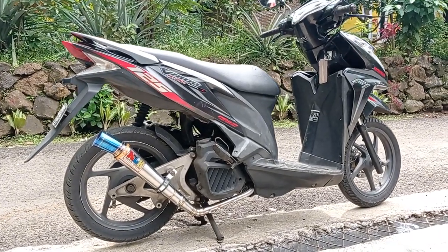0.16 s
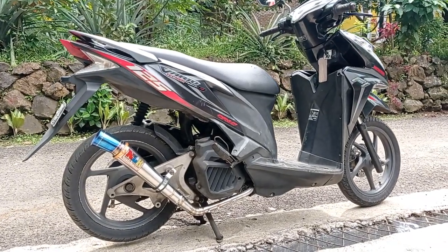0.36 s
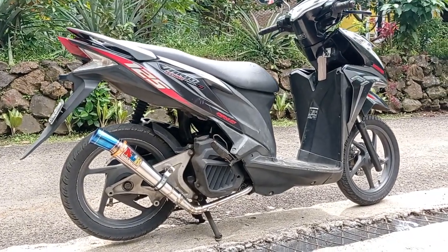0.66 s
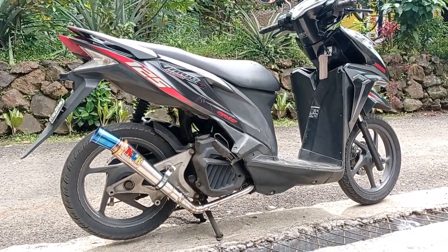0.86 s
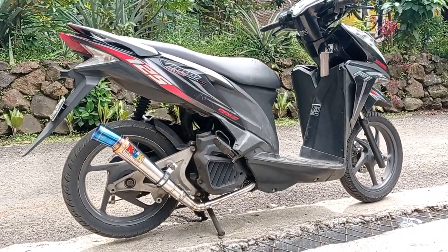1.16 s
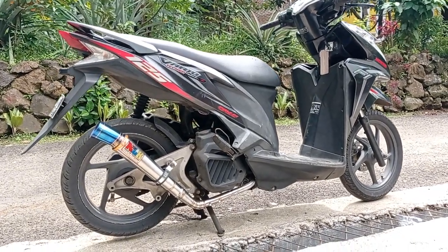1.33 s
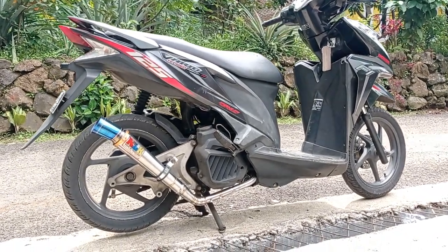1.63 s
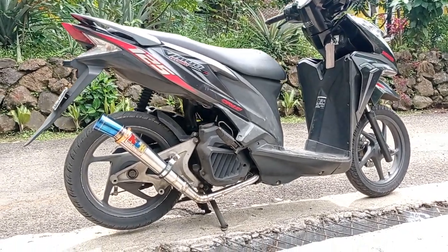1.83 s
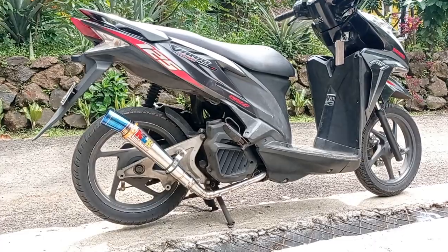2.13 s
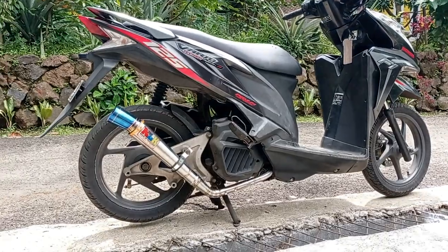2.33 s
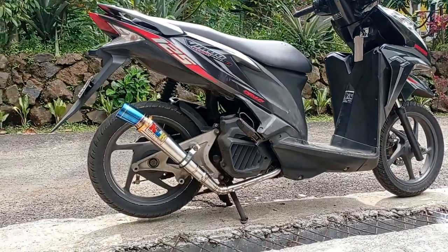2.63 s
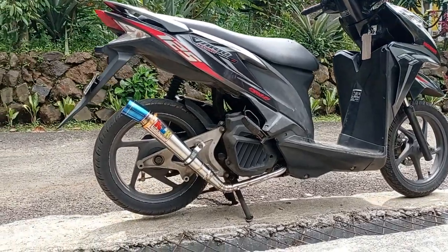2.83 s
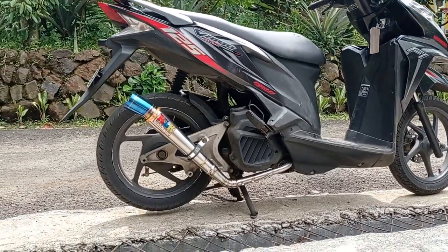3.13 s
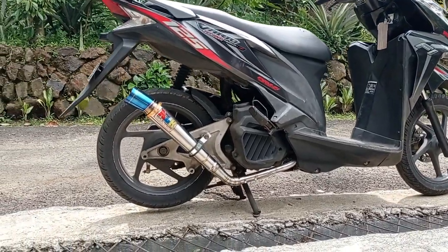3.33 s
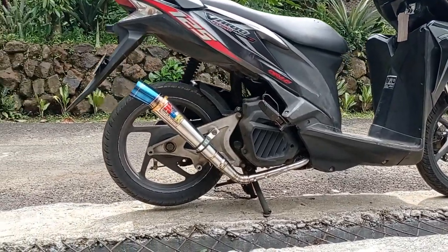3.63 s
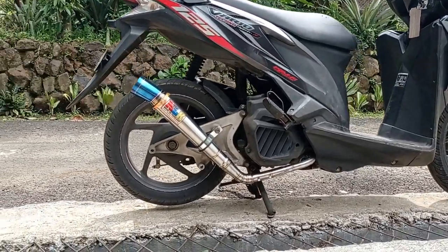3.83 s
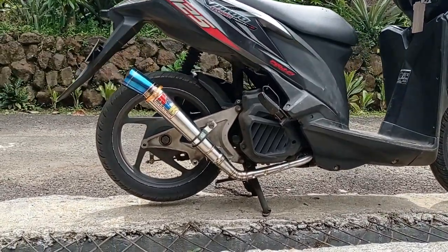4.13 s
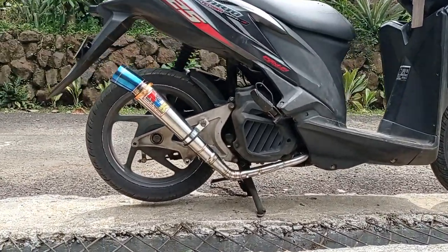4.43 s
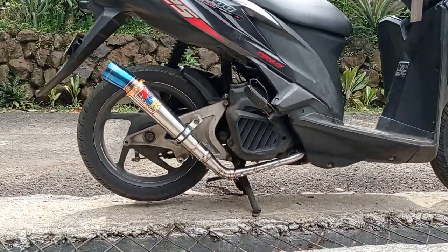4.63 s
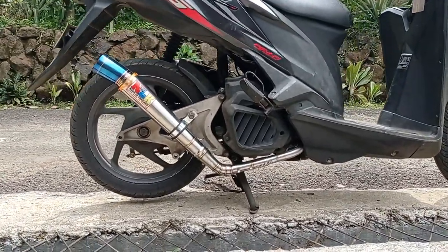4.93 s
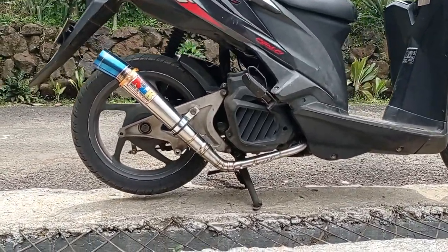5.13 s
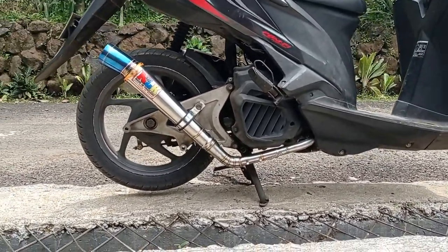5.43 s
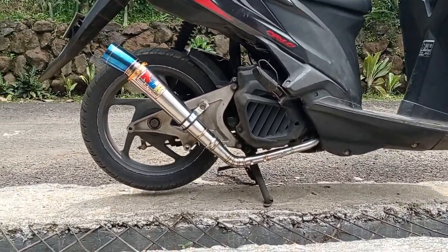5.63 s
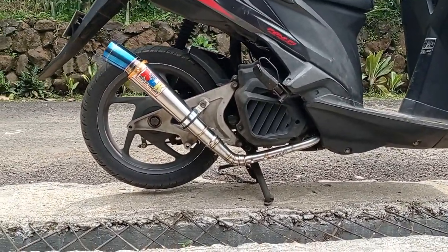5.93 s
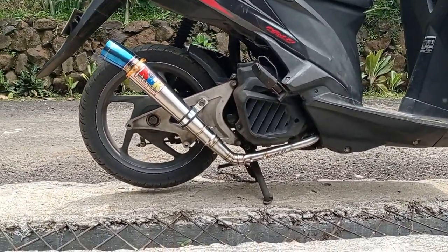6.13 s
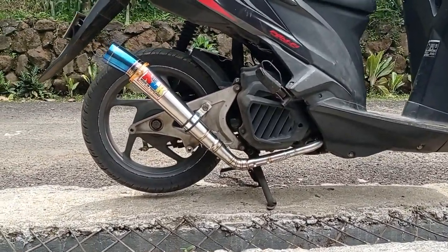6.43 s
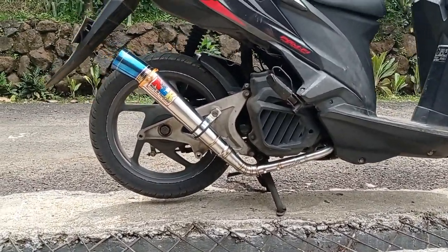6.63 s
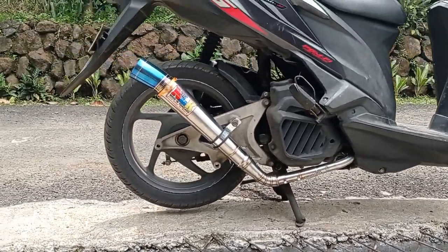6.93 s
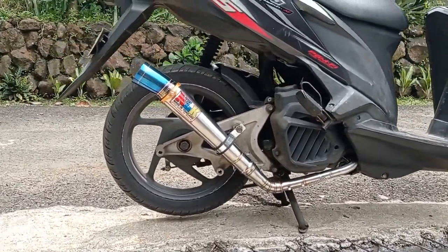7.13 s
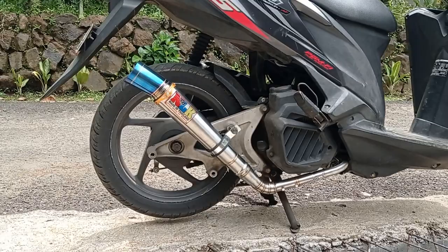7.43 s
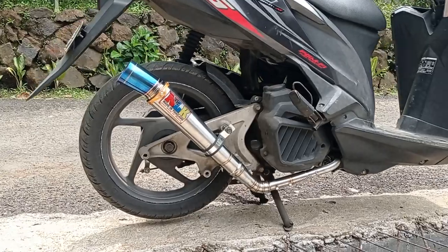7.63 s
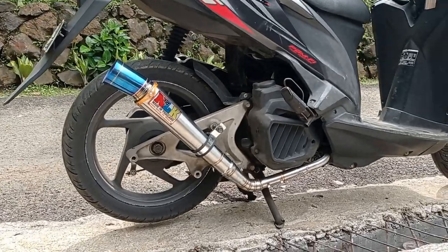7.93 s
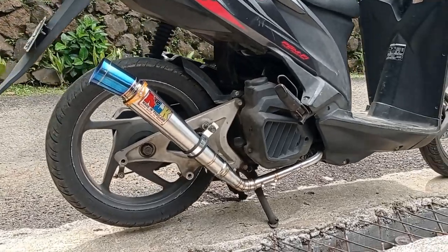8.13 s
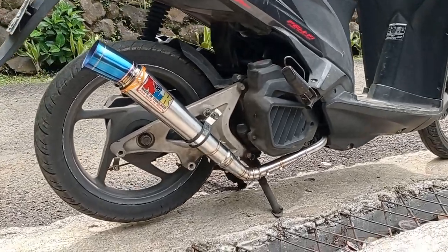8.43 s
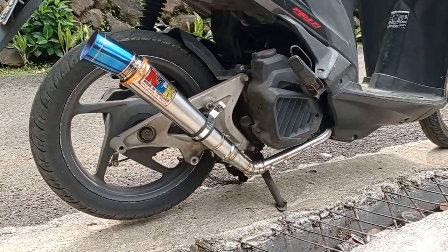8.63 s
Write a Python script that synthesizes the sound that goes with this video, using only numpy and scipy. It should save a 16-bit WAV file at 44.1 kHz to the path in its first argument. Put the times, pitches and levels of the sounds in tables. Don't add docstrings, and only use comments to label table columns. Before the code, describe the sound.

A small single-cylinder scooter engine idles unevenly through an open exhaust, rapid hollow thumps with metallic ring and hiss, dropping early to slower idle.

```python
import sys
import numpy as np
from scipy import signal
from scipy.fft import rfft, irfft, next_fast_len
from scipy.io import wavfile
from scipy.ndimage import uniform_filter1d, minimum_filter1d, map_coordinates

SR = 44100
rng = np.random.default_rng(int(sys.argv[2]) if len(sys.argv) > 2 else 0)


def to_linear_factor(level_db):
    exponent = np.asarray(level_db, float) / 20
    return 10 ** exponent


def bounce(signal):
    frames = np.transpose(np.atleast_2d(signal))
    limited = np.clip(frames, -1, 1)
    pcm = np.round(limited * 32767).astype(np.int16)
    wavfile.write(sys.argv[1], SR, pcm)


N = 387198
MS = np.arange(-14 * SR // 1000, 70 * SR // 1000) * 1000 / SR
FAST_IDLE_ENDS_S = .93

# (time [s], pipe ring [dB], can ring [dB], valve-shut wave [dB], facing the outlet [0-1])
ENGINE_STATE = [
    (0, -13.5, -13.5, -16.5, 0.08),
    (.92, -11, -13.5, -26, 0.2),
    (1, -16, -19, -16.5, 0.2),
    (3, -12, -17.5, -16.5, 0.01),
    (5, -17.5, -21.5, -15.5, 0),
    (7, -19.5, -17, -14, 0.01),
    (7.6, -20, -13, -9.5, 1),
    (8.78, -16.5, -9.5, -6.5, 1),
]

# (time [s], level [dB])
GOOD_BURN = [(0, -10), (.49, -7.5), (.9, -11.2), (.95, -15.5), (2.21, -9.5), (3.54, -6.5), (3.94, -5),
             (4.2, -6.5), (4.4, -5.2), (4.54, -3), (4.93, -4.5), (7.63, -6), (8.21, -7.5), (8.59, -4.5),
             (8.79, -7)]


def unit(x):
    return x / np.sqrt(np.mean(x ** 2) + 1e-20)


def curves(rows, at):
    s, *cols = np.transpose(rows)
    return [np.interp(at, s, c) for c in cols]


def filtered(x, response):
    m = next_fast_len(N + 8192)
    return irfft(rfft(x, m) * response(np.fft.rfftfreq(m, 1 / SR)), m)[..., :N]


def slope(points):
    f, db = np.transpose(points)
    return lambda hz: to_linear_factor(np.interp(np.log(hz + 1), np.log(f + 1), db))


def modes(rows):
    def response(f):
        total = 0
        for k, (centre, width, db) in enumerate(rows):
            band = 1j * f * width
            total = total + (-1) ** k * to_linear_factor(db) * band / (centre * centre - f * f + band)
        return total
    return response


def noise(response):
    return unit(filtered(rng.standard_normal(N), response))


def patchy(x, depth_db):
    z = signal.stft(x, nperseg=512)[2]
    field = uniform_filter1d(rng.standard_normal(z.shape), size=5, axis=0)
    field = uniform_filter1d(field, size=16, axis=1)
    return unit(signal.istft(z * to_linear_factor(depth_db * unit(field)), nperseg=512)[1][:N])


def wave(ms, width, skew=0):
    u = (MS - ms) / np.clip(width, .3, 4)
    return (u * u - 1) * np.exp(-u * u / 2) * (1 + skew * np.tanh(u))


def puff(ms, rise, fall_db):
    t = np.clip(MS - ms, 0, None)
    return (1 - np.exp(-t / rise)) * to_linear_factor(-fall_db * t)


def ring(ms, hz, t60):
    return puff(ms, rise=.5 + 400 / hz, fall_db=0.053 / t60) * np.sin(2 * np.pi * hz * (MS - ms) / 1000)


def cycles():
    # (time [s], time between firings [ms])
    firing_gap = [(0, 57.72), (.66, 58.52), (.78, 57.22), (1.2, 62.46), (1.58, 63.8), (2.28, 64.86),
                  (2.47, 65.73), (2.8, 67.32), (3.21, 67.49), (3.81, 64.94), (3.87, 66.79), (4.87, 66.12),
                  (5.07, 67.03), (5.39, 64.36), (6.25, 66.82), (6.58, 65.91), (7.56, 65.22), (8.79, 63.35)]
    # (time [s], level against a good burn [dB])
    weak_burns = [(1.637, -2.5), (1.764, -9), (1.891, -8), (2.018, -9.5), (2.147, -10), (2.276, -7.5),
                  (2.408, -1.5), (2.538, -10), (2.737, -2.5), (2.871, -12.5), (3.005, -2.5), (3.14, -1.5),
                  (4.335, -8), (4.536, -3), (4.866, -8), (4.998, -2.5), (5.265, -2), (5.783, -2),
                  (5.851, -4.5), (5.981, -2.5), (6.11, -8), (6.38, -1.5), (6.511, -1), (7.105, -2),
                  (7.821, -3), (7.951, -5), (8.465, -4), (8.591, -6)]
    early_ms, catch_up_ms = .234, .053
    lean_start_s, lean_end_s, lean_early_ms = 1.0, 1.6, 2.0

    s = [.0246]
    while s[-1] < N / SR:
        s.append(s[-1] + curves(firing_gap, s[-1])[0] / 1000)
    s = np.array(s)
    loss_db = np.zeros(len(s))
    for at, db in weak_burns:
        k = np.argmin(abs(s - at))
        loss_db[k] = -db
        s[k + 1:] += catch_up_ms * db / 1000
    dropped = (s > lean_start_s) & (s < lean_end_s)
    lean = dropped & (np.arange(len(s)) % 2 == 1)
    s = s - (early_ms * loss_db + lean_early_ms * (lean - .5 * dropped)) / 1000
    return s[:, None], loss_db[:, None], lean[:, None]


def burns():
    # (time [s], jet gain [dB])
    spits = [
        (3.074, 2.5),
        (3.208, 3.5),
        (3.277, 6),
        (4.603, 4),
        (4.933, 1.5),
        (5.199, 0.5),
        (6.047, 4.5),
        (6.247, 0.5),
        (6.776, 5),
        (7.693, 4),
    ]
    s, loss_db, lean = cycles()
    luck, fast = rng.standard_normal((len(s), 3, 1)), s < FAST_IDLE_ENDS_S
    blow_db = curves(GOOD_BURN, s)[0] - loss_db + .5 * luck[:, 0]
    whistle_db = blow_db - 27.5 - 1 * fast - .3 * loss_db - 1 * lean + 0.6 * luck[:, 1]
    jet_db = blow_db - 32 + 7 * fast - 0.4 * loss_db - 1 * lean + 1.43 * luck[:, 2]
    rebound_db = 0.051 * np.roll(loss_db, 1)
    for at, db in spits:
        jet_db[np.argmin(abs(s - at))] += db
    return blow_db, whistle_db + rebound_db, jet_db + rebound_db


def weakness(blow_db):
    strongest = -minimum_filter1d(-blow_db, size=5, axis=0)
    return np.clip((strongest - blow_db - 3.0) / 9, 0, 1)


def shut_off():
    shuts_ms, left = 21.0, .5
    return 1 - (1 - left) * np.clip((MS - shuts_ms) / 3, 0, 1)


def per_firing(shapes):
    start = np.round((cycles()[0] + MS[0] / 1000) * SR).astype(int) + SR
    at = start + np.arange(len(MS))
    return np.bincount(at.ravel(), shapes.ravel(), N + 2 * SR)[SR:SR + N]


def background_levels():
    t = np.arange(N) / SR
    near_db = uniform_filter1d(curves(GOOD_BURN, t)[0], size=SR // 8, mode='nearest')
    return near_db, np.clip((FAST_IDLE_ENDS_S - t) / .04 + 1, 0, 1)


def wind():
    near_db, _ = background_levels()
    gusts = map_coordinates(rng.standard_normal(40), [3 * np.arange(N) / SR])
    level_db = -54.5 + 0.73 * near_db + 5.5 * gusts
    return to_linear_factor(level_db + 19.5) * noise(lambda hz: hz / (1 + (hz / 24) ** 8))


def bird():
    # (time [s], length [s], pitch [Hz], level [dB])
    peeps = [
        (2.065, 0.085, 6410, -59),
        (2.458, 0.068, 6430, -54),
        (2.604, 0.063, 6400, -66),
        (2.762, 0.07, 6450, -57),
        (2.86, .05, 6180, -63),
    ]
    t = np.arange(N) / SR
    flutter = .4 * np.sin(2 * np.pi * 40 * t)
    total = 0
    for s, span, hz, db in peeps:
        swell = np.sin(np.pi * np.clip((t - s) / span, 0, 1)) ** .6
        total = total + to_linear_factor(db + 6.5) * swell * np.sin(2 * np.pi * hz * t + flutter)
    return total


def footstep():
    # (time [s], length [s], centre [Hz], width [Hz], level [dB])
    scuff = (7.665, .1, 680, 450, -37)
    s, span, hz, width, db = scuff
    swell = np.sin(np.pi * np.clip((np.arange(N) / SR - s) / span, 0, 1))
    return to_linear_factor(db) * swell * noise(lambda f: modes([(hz, width, 0)])(f) ** 2)


def cooling_fan():
    # (resonance [Hz], width [Hz], level [dB])
    shroud = [(2146, 250, 1), (2910, 460, -1.5), (3950, 1300, -6), (5420, 400, -4), (6400, 980, -12)]
    near_db, fast = background_levels()
    level_db = -43.5 + 4 * fast + 1.06 * near_db
    grain = to_linear_factor(2.2 * unit(uniform_filter1d(rng.standard_normal(N), size=150)))
    air = noise(lambda hz: modes(shroud)(hz) * (1 - 1 / (1 + (hz / 1900) ** 6)))
    return to_linear_factor(level_db + 0.22) * grain * patchy(air, depth_db=1.8)


def crankcase():
    # (frequency [Hz], level [dB per Hz])
    rattle = [(180, -33.5), (300, -3), (414, 1), (476, -4.5), (680, -15), (890, -11.5), (1120, -14.5),
              (1420, -12), (1670, -15.5), (2400, -25.5), (3120, -54), (5280, -120)]
    near_db, fast = background_levels()
    level_db = -40.5 - 3.5 * fast + 0.89 * near_db

    def case_band(hz):
        return slope(rattle)(hz) * hz ** 4 / (hz ** 4 + 300 ** 4) / (1 + (hz / 2200) ** 6)
    return to_linear_factor(level_db + 3.5) * noise(case_band)


def bracket():
    # (time [s], peak [dB], pitch [Hz])
    pings = [
        (0.4244, -27, 2930),
        (2.599, -28, 2500),
        (3.2013, -26, 2660),
        (4.5965, -21.5, 5170),
        (6.0395, -24, 5280),
        (6.8359, -26, 2780),
    ]
    t60 = .03
    t = np.arange(N) / SR
    total = 0
    for s, db, hz in pings:
        after = np.clip(t - s, 0, 1)
        envelope = to_linear_factor(db - 4 - 60 * after / t60) * (1 - np.exp(-after / .001))
        total = total + envelope * np.sin(2 * np.pi * hz * after)
    return total


def struck(rows, level_db, left=1):
    s = cycles()[0]
    facing, fast = np.clip(curves(ENGINE_STATE, s)[3], 0, 1), s < FAST_IDLE_ENDS_S
    luck = rng.standard_normal((len(s), len(rows), 3, 1))
    total = 0
    for k, (hz, t60, ms, fast_db, side_db, rear_db) in enumerate(rows):
        db = np.where(fast, fast_db, side_db + facing * (rear_db - side_db)) + 1.4 * luck[:, k, 0]
        pitch = hz * (1 + 0.0067 * luck[:, k, 1])
        total = total + to_linear_factor(db) * ring(ms + .12 * luck[:, k, 2], pitch, t60)
    damped = 1 - (1 - left) * np.clip((MS - 8.5) / 2, 0, 1)
    return per_firing(to_linear_factor(level_db) * total * damped * shut_off())


def shell(blow_db):
    # (mode [Hz], t60 [s], start [ms], fast idle [dB], side [dB], rear [dB])
    shell_modes = [(367.8, 0.069, -1.5, -23, -23, -16.5), (569, 0.066, -2.5, -20.5, -23.5, -26),
                   (648, 0.045, -0.5, -22, -33, -24.5), (758, .06, -1.5, -26, -34.5, -31.5),
                   (814, 0.042, -3.5, -45, -32, -44), (887.5, 0.06, -3, -47, -27.5, -41),
                   (910, 0.043, 13, -46, -27, -39), (576, 0.075, 12.5, -36, -29.5, -26)]
    return struck(shell_modes, blow_db + 3 * weakness(blow_db))


def swirl(blow_db):
    # (resonance [Hz], width [Hz], level [dB])
    core_turbulence = [(683, 430, 0.5), (1482, 400, 1.5), (2060, 500, -4)]
    gas = puff(-10.0, rise=1.4, fall_db=0.23) + 1.3 * puff(11.0, rise=1.0, fall_db=2.0)
    level_db = blow_db - 33 + 9.4 * weakness(blow_db)
    rush = noise(lambda f: modes(core_turbulence)(f) ** 2)
    return per_firing(to_linear_factor(level_db) * gas * shut_off()) * rush


def jet(blow_db, jet_db):
    # (frequency [Hz], level [dB per Hz])
    slow_colour = [(1060, -34), (1800, -4), (2070, -2), (2240, -3), (2580, -9), (2840, -4), (3310, -7.5),
                   (4270, -9.5), (4580, -11), (5250, -7.5), (5770, -10), (6270, -8.5), (7400, -15),
                   (9620, -39.5), (16300, -120)]
    # (frequency [Hz], level [dB per Hz])
    fast_colour = [(1060, -32), (1800, -8.5), (2410, 1), (2590, -14.5), (2850, -2), (3980, -4.5),
                   (4850, -1), (5300, -2), (7500, -4), (9750, -30), (16500, -120)]

    def hiss(colour):
        return noise(lambda hz: slope(colour)(hz) * hz ** 2 / (hz ** 2 + 1900 ** 2))
    stream = to_linear_factor(jet_db + 2.5) * puff(-7.0, rise=0.91, fall_db=0.9)
    shut_gas = puff(17.5, rise=0.96, fall_db=1.3) + .5 * puff(36, rise=0.94, fall_db=0.5)
    shut = to_linear_factor(blow_db - 39.5 + 5.3 * weakness(blow_db)) * shut_gas
    colour = np.where(np.arange(N) < FAST_IDLE_ENDS_S * SR, hiss(fast_colour), hiss(slow_colour))
    return per_firing(stream + shut) * patchy(colour, depth_db=2.5)


def bark(whistle_db):
    # (time [s], level [dB])
    bark_level = [
        (0, -3),
        (.93, 3),
        (1, 10.5),
        (2.9, 8.5),
        (3.6, 6.5),
        (7.2, 5.5),
        (8.78, 3.5),
    ]
    start_hz, start_ms, fall_db, sag_hz = 1529, -10, 2.0, 20
    s, loss_db, lean = cycles()
    luck = rng.standard_normal((len(s), 2, 1))
    t = np.clip(MS - start_ms - 0.27 * luck[:, 0], 0, None)
    turns = ((start_hz + 40 * luck[:, 1]) * t - sag_hz * t * t / 2) / 1000
    level_db = whistle_db + curves(bark_level, s)[0] - 15 * lean - 1.3 * loss_db
    envelope = to_linear_factor(level_db - fall_db * t) * (1 - np.exp(-t / .25))
    return per_firing(envelope * np.sin(2 * np.pi * turns))


def whistle(whistle_db):
    # (mode [Hz], t60 [s], start [ms], fast idle [dB], side [dB], rear [dB])
    core_modes = [(1035, 0.065, -7.5, -12, -16.5, 0), (1123, 0.072, -7.5, 3.5, -27.5, -5),
                  (1229, 0.079, -7, -13, -2, -1.5), (1312, 0.078, -6, -15, -3.5, -9),
                  (1414, 0.089, -9, -16, 1.5, -7), (1501, .07, -4, -4.5, -4, -8),
                  (1585, 0.051, -8.5, -1, -10.5, -7.5), (1770, 0.1, -8, -12, -10.5, -12),
                  (1980, 0.034, -7, -22, -7, -24.5), (2120, 0.1, -6.5, -17, -17.5, -14.5),
                  (2845, 0.046, -7, -21, -9, -24)]
    return struck(core_modes, whistle_db + 1.88, left=.65)


def thump(blow_db):
    # (time [ms], level [dB], width [ms], lean to the later crest [ratio])
    pressure_waves = [
        (-5.5, -9.5, 1.343, 0.55),
        (0, -2.5, 1.573, -0.13),
        (8.5, -5.4, 1.567, -0.021),
    ]
    # (mode [Hz], level [dB], t60 [s], start [ms])
    pipe_modes = [(189.3, -2, 0.15, 19.13), (121.5, -2.5, 0.1, 27.44), (303, -13.5, 0.088, 21)]
    s = cycles()[0]
    weak, fast = weakness(blow_db), s < FAST_IDLE_ENDS_S
    after_db, can_db, shut_db, _ = curves(ENGINE_STATE, s)
    luck = rng.standard_normal((len(s), 8, 1))
    stretch = 1 + 0.1 * fast

    gas = 0
    for k, (ms, db, width, skew) in enumerate(pressure_waves):
        gas = gas + to_linear_factor(db + .8 * luck[:, k]) * wave(ms + 0.17 * luck[:, k + 3], width * stretch, skew)
    gas = gas + to_linear_factor(can_db + 0.5 * luck[:, 6]) * ring(-4.0, hz=414.6, t60=0.073)
    gas = gas - to_linear_factor(-20) * (s > FAST_IDLE_ENDS_S) * ring(-2.5, hz=79, t60=.13)
    gas = gas + to_linear_factor(shut_db + 16.7 * weak) * wave(14.78 + 2.4 * weak, width=1.41)
    gas = gas + 0.69 * weak * wave(22.5, width=1.5)
    for hz, db, t60, ms in pipe_modes:
        level_db = after_db + db + 5 * weak + 1.1 * luck[:, 7]
        gas = gas + to_linear_factor(level_db) * ring(ms + 1.1 * luck[:, 6] - 1.0 * fast, hz, t60)
    return per_firing(to_linear_factor(blow_db) * gas)


def scene():
    blow_db, whistle_db, jet_db = burns()
    surroundings = wind() + bird() + footstep()
    gear = cooling_fan() + crankcase() + bracket()
    exhaust = shell(blow_db) + swirl(blow_db) + jet(blow_db, jet_db)
    exhaust = exhaust + bark(whistle_db) + whistle(whistle_db) + thump(blow_db)
    return (surroundings + gear + exhaust)[None]


def low_pass(x):
    return signal.sosfilt(signal.butter(12, 8430, fs=SR, output="sos"), x)


def record(dry):
    # (frequency [Hz], level [dB])
    phone_band = [(31, -19), (40, -12), (55, -6), (75, -4.5), (95, 0), (7300, 0.5), (7900, -6),
                  (8400, -21.5), (8900, -53.5), (12000, -62)]
    mix = filtered(dry, slope(phone_band))
    return low_pass(mix)


dry = scene()
out = record(dry)
bounce(out)
```